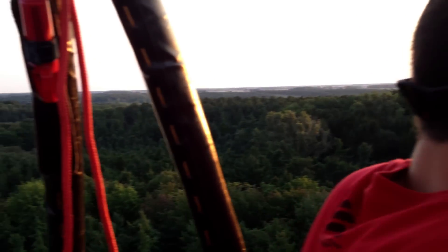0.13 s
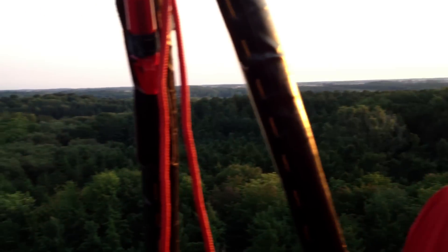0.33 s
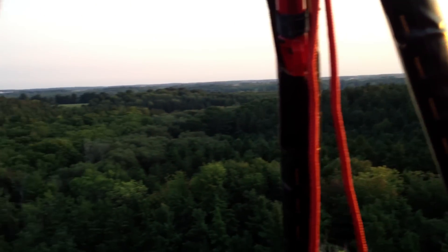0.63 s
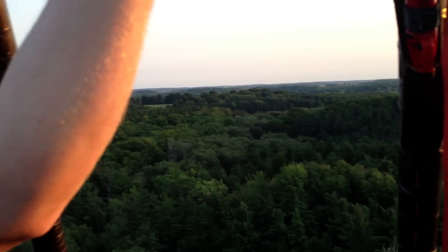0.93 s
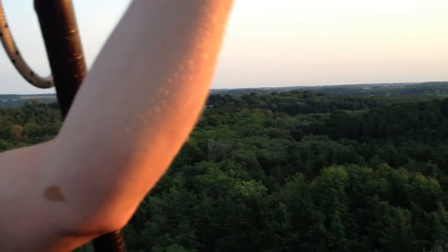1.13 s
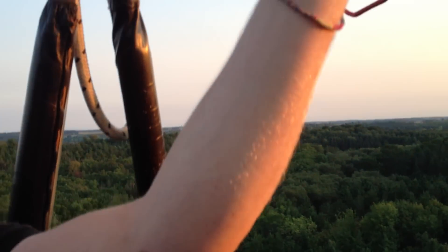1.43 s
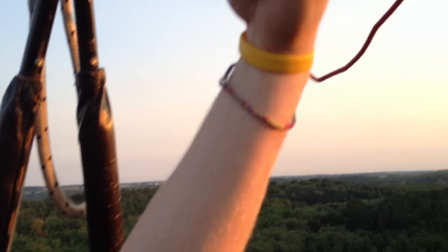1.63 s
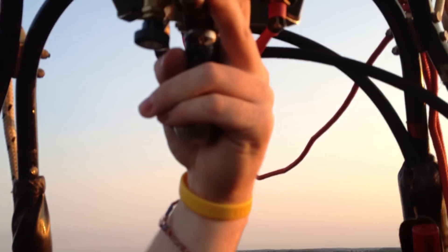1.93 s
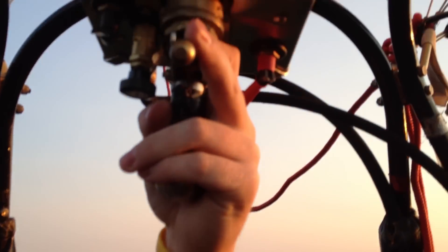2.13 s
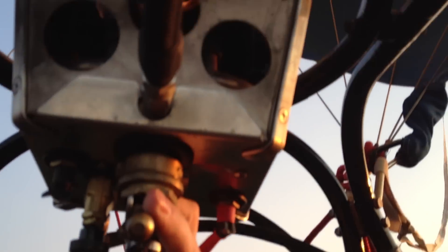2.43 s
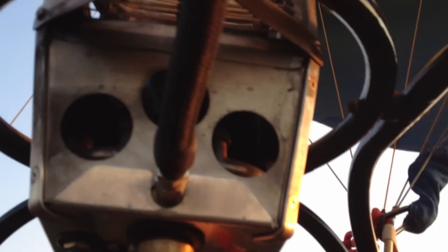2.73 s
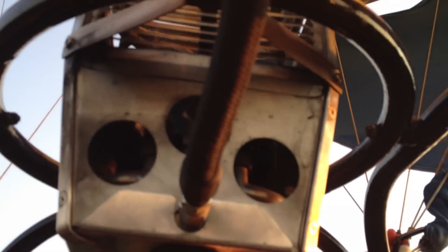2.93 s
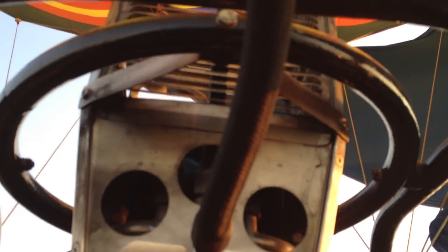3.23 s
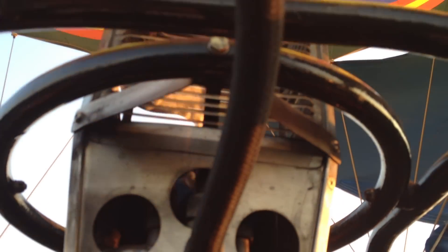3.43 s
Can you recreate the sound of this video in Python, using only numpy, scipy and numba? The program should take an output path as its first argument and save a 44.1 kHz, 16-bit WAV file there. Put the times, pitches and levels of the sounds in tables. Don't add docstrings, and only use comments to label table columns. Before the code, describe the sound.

Loud steady gas burner roar for two seconds, abrupt cutoff, then quiet pilot hiss and small pops.

```python
import sys
import numpy as np
from scipy import signal
from scipy.fft import rfft, irfft
from scipy.io import wavfile
from scipy.ndimage import uniform_filter1d, map_coordinates
from numba import njit

SR = 44100
rng = np.random.default_rng(int(sys.argv[2]) if len(sys.argv) > 2 else 0)


def invert_db(level):
    return 10 ** (np.asarray(level, dtype=float) / 20)


def log_audio(samples):
    frames = np.atleast_2d(samples).T
    limited = np.clip(frames, -1, 1)
    pcm = np.round(limited * 32767).astype(np.int16)
    wavfile.write(sys.argv[1], SR, pcm)


N = 158760
TOP_HZ = 15300

# start_s, flame_level_db, jet_level_db
BURN_LEVELS = [(0.0, -6.5, -13), (0.05, -9.5, -14), (0.1, -10.5, -12.5), (0.22, -8, -14),
               (0.27, -10, -13.5), (0.84, -10.5, -13.5), (0.88, -13, -16.5), (0.9, -11, -15),
               (1.13, -9, -13), (1.29, -9.5, -15.5), (1.62, -10, -14.5), (2.01, -13, -22.5),
               (2.05, -21, -28), (2.07, -18.5, -35.5), (2.16, -53, -64), (2.2, -28, -69)]
# frequency_hz, density_db
PILOT_AIR_SHAPE = [(600, -11.5), (1900, -16.5), (5000, -10.5), (6300, -14), (8500, -11), (10800, -18.5),
                   (12300, -10.5), (13300, -19), (14600, -16.5)]


def level(x, db):
    return x * invert_db(db) / np.sqrt(np.mean(x ** 2))


def curve(rows, col):
    rows = np.array(rows, float)
    return np.interp(np.arange(N) / SR, rows[:, 0], rows[:, col])


@njit
def svf(x, hz, width, rate):
    y, b, l = np.empty(len(x)), 0., 0.
    for i in range(len(x)):
        g, k = np.tan(np.pi * hz[i] / rate), width / hz[i]
        v = (b + g * (x[i] - l)) / (1 + g * (g + k))
        b, l, y[i] = 2 * v - b, l + 2 * g * v, k * v
    return y


def resonance(x, hz, width_hz):
    return svf(x, np.full(N, 1.) * hz, 1. * width_hz, 1. * SR)


def walk(rate):
    hold = int(SR / rate)
    steps = np.repeat(rng.standard_normal(N // hold + 1), hold)
    v = uniform_filter1d(uniform_filter1d(steps, hold), hold)[:N]
    return v - uniform_filter1d(v, size=SR // 4)


def eddies(shape, walk_db, flicker_db, flicker_rate):
    f = np.maximum(np.arange(N // 2 + 1) * SR / N, 1)
    hz, db = np.array(shape, float).T
    white = rfft(rng.standard_normal(N)) * invert_db(np.interp(np.log(f), np.log(hz), db, left=-90))
    out, swell = 0, walk_db * walk(flicker_rate)
    for octave in np.arange(np.log2(hz[0]), np.log2(hz[-1]) + 1, 1 / 3):
        overlap = np.clip(1 - 3 * np.abs(np.log2(f) - octave), 0, 1)
        band = irfft(white * overlap, N)
        out = out + band * invert_db(swell + flicker_db * walk(flicker_rate))
    return level(out, 0)


def flame_rumble():
    # frequency_hz, density_db
    flame_shape = [(30, -14), (64, -32), (139, -6.5), (230, 0), (386, -7), (620, -12), (790, -14.5),
                   (900, -20), (2200, -27), (3200, -60)]
    return eddies(flame_shape, -0.9, 1.5, 13.9) * invert_db(curve(BURN_LEVELS, 1))


def jet_hiss():
    # frequency_hz, density_db
    jet_shape = [(1500, 1), (2500, 2.5), (4300, -2.5), (5900, -0.5), (8700, 0.5), (9400, -3), (11000, -1.5),
                 (15000, -1)]
    # pitch_hz, width_hz, level_db
    coil_tones = [
        (2170, 290, -16.5),
        (4630, 650, -17),
    ]
    coil = sum(level(resonance(rng.standard_normal(N), hz, width), db) for hz, width, db in coil_tones)
    heat = np.clip((np.arange(N) / SR - 1.55) / 0.35, 0, 1)
    jet = eddies([(800, -22)] + list(jet_shape), 0.52, 1.55, 16.0)
    jet = jet + coil * invert_db(8.5 * heat)
    return jet * invert_db(curve(BURN_LEVELS, 2))


def pan_mirror(jet):
    extra_path_m, mirror_top_hz, mirror_db = 0.215, 9700, -29
    late = np.arange(N) - extra_path_m / 343 * SR
    dull = signal.sosfiltfilt(signal.butter(2, mirror_top_hz, fs=SR, output="sos"), jet)
    return invert_db(mirror_db) * map_coordinates(dull, [late], order=3, mode="mirror")


def turning_phone(flame, jet):
    # start_s, ridge_hz, ridge_db, shadow_depth (0-1), shadow_hz
    hand = [(0, 4280, -9, 0.57, 2100), (.25, 4340, -1.5, .5, 1990), (.55, 4300, -3, 0.22, 1810),
            (.7, 3440, -7, 0.2, 1750), (1.0, 3500, -2.5, 0.52, 1840), (1.2, 3900, 2.5, 0.73, 2210),
            (1.5, 3700, 1.5, 0.64, 2080), (1.7, 3480, -11, 0.22, 2730), (1.95, 3500, -8, 0.38, 2560),
            (2.1, 3500, 0, 0.28, 2450)]
    # start_s, low_glint_hz, low_glint_db, high_glint_hz, high_glint_db
    glint = [(0, 5130, -9, 7700, -6), (.4, 5200, -9, 7650, -12), (.7, 5170, 1, 7400, -3),
             (.95, 5200, -8, 7000, -7), (1.2, 5000, -6, 7550, -4.5), (1.5, 5030, -8, 7400, -11),
             (1.75, 4780, -10.5, 7700, -6.5), (2.1, 4700, -20, 7800, -18)]
    glint_widths = (350, 1200)
    # start_s, body_db, rim_hz, rim_db
    rim = [(0, -20, 1270, -6), (.4, -4, 1210, -10), (.8, 0.5, 1300, -11.5), (1.1, 1, 1470, -4),
           (1.5, 0.5, 1480, -5), (1.75, 0, 1110, -6), (1.95, 6, 1090, 7.5), (2.1, -6, 1070, 1)]
    roar = flame + jet + invert_db(curve(hand, 2)) * resonance(jet, curve(hand, 1), 500)
    for col, width in zip((1, 3), glint_widths):
        roar = roar + invert_db(curve(glint, col + 1)) * resonance(jet, curve(glint, col), width)
    body = invert_db(curve(rim, 1)) * resonance(flame, 598, 163)
    ring = invert_db(curve(rim, 3)) * resonance(roar, curve(rim, 2), 117)
    roar = roar + body + ring
    return roar - np.clip(curve(hand, 3), 0, 1) * resonance(roar, curve(hand, 4), 1100)


def burner():
    shut_s, closing_s = 2.2, 0.096
    flame, jet = flame_rumble(), jet_hiss()
    roar = turning_phone(flame, jet + pan_mirror(jet))
    return roar * np.clip((shut_s - np.arange(N) / SR) / closing_s, 0, 1)


def wide_patches():
    # middle_s, low_hz, high_hz, level_db
    patches = [
        (.09, 5700, 6900, -23.5),
        (.09, 11000, 13700, -22),
        (.88, 4230, 6300, -22),
        (1.16, 9700, 10900, -26),
        (1.51, 11900, 13200, -26),
        (1.879, 5760, 8250, -26),
        (1.88, 13800, 15200, -30),
        (1.95, 4240, 5150, -29),
    ]
    patch_s = 0.03
    f, t = np.arange(N // 2 + 1) * SR / N, np.arange(N) / SR
    white, side = rfft(rng.standard_normal(N)), 0
    for s, lo_hz, hi_hz, db in patches:
        fade = np.cos(np.pi * np.clip((t - s) / patch_s, -.5, .5)) ** 2
        side = side + level(irfft(white * (f > lo_hz) * (f < hi_hz), N), db) * fade
    return side * np.array([[1], [-1]])


def pilot_whistle(pitch_hz):
    # pitch_ratio, width_hz, level_db
    whistle_bands = [
        (.482, 120, -3),
        (.76, 140, -9),
        (1, 160, 0),
        (1.46, 380, -7),
        (1.94, 300, -12),
    ]
    upper = np.clip((np.arange(N) / SR - 2.3) / .18, .2, 1)
    tube = 0
    for ratio, width, db in whistle_bands:
        once = resonance(rng.standard_normal(N), ratio * pitch_hz, 1.6 * width)
        band = level(resonance(once, ratio * pitch_hz, 1.7 * width), 0)
        sputter = 1.8 * (walk(39.7) + walk(7.7))
        tube = tube + invert_db(db + sputter) * (upper if ratio > .5 else 1) * band
    return level(tube, 3)


def pilot():
    # start_s, hiss_db, whistle_hz, whistle_over_hiss_db
    pilot_course = [(2.14, -60.5, 4970, -5), (2.33, -58.5, 5130, -4), (2.47, -57.5, 5020, -1.5),
                    (2.6, -58, 4850, -2), (2.95, -56.5, 4910, -2), (3.1, -54, 5080, -1),
                    (3.3, -51, 4990, -5), (3.42, -50.5, 5200, -2.5), (3.6, -52, 5080, -4.5)]
    # frequency_hz, density_db
    rumble_shape = [(24, -60), (40, -18), (215, -3.5), (446, -16), (503, -10.5), (604, -21), (1500, -29),
                    (1950, -32), (3300, -120)]
    # start_s, level_db
    lick_levels = [(2.12, -37), (2.23, -44), (2.36, -42.5), (2.52, -44.5), (2.62, -50), (2.7, -52.5),
                   (2.85, -45.5), (2.92, -48), (3.05, -49.5), (3.2, -44.5), (3.6, -51.5)]
    whistle = pilot_whistle(curve(pilot_course, 2)) * invert_db(curve(pilot_course, 3))
    air = invert_db(4.5) * eddies(PILOT_AIR_SHAPE, .8, 2.2, 24.86)
    rumble = eddies(rumble_shape, 2.2, 3, 30.06) * invert_db(curve(lick_levels, 1))
    return (whistle + air) * invert_db(curve(pilot_course, 1)) + rumble


def flutters():
    # start_s, peak_db, pitch_hz, cycles
    early_licks = [(2.174, -32, 184, 4.9), (2.199, -25.5, 174, 2.8), (2.244, -40, 218, 3.4),
                   (2.269, -32, 312, 4.1), (2.275, -24, 210, 3.3), (2.293, -28, 215, 3.5),
                   (2.334, -25, 220, 4), (2.349, -27, 297, 3.4), (2.366, -29, 166, 4.1),
                   (2.373, -31, 402, 3.6), (2.714, -30, 155, 3.7), (2.738, -32, 178, 4.1),
                   (2.786, -31.5, 202, 3.6), (2.844, -29, 231, 2.3), (2.863, -26, 186, 2.3),
                   (2.869, -25, 147, 5.2), (2.901, -35, 142, 2.6), (3.078, -33.5, 233, 3.4),
                   (3.128, -32, 143, 2.9), (3.14, -31, 149, 3.2), (3.15, -40, 258, 2.5),
                   (3.167, -40, 250, 1.8), (3.157, -32, 122, 4.7), (3.179, -28, 178, 1.5),
                   (3.192, -27, 183, 2.1), (3.230, -29, 198, 1.4), (3.239, -28, 325, 3.2),
                   (3.261, -35, 298, 3.3), (3.082, -43, 1000, 8), (3.263, -42, 1020, 9.2)]
    # start_s, peak_db, pitch_hz, cycles
    late_licks = [(3.303, -34, 178, 2.8), (3.317, -35, 156, 3), (3.341, -28, 200, 2.4),
                  (3.352, -24.5, 182, 2.9), (3.374, -41, 229, 2.4), (3.389, -30, 175, 2),
                  (3.409, -27.5, 166, 4.4), (3.427, -32, 220, 5.6), (3.446, -31, 181, 2.7),
                  (3.46, -31, 121, 1.9), (3.496, -33.5, 149, 4.1), (3.564, -38, 288, 2.7),
                  (3.566, -47, 950, 6), (3.586, -33, 450, 3.3), (3.581, -25, 228, 2.3),
                  (3.588, -32, 238, 2.9)]
    out, t = np.zeros(N), np.arange(N) / SR
    grit = eddies([(250, 17.0), (450, 0), (800, -15), (1300, -19.5)], 0, 0, 25.) * invert_db(-13)
    licks = list(early_licks) + list(late_licks)
    for (s, db, hz, cycles), turn in zip(licks, rng.random(len(licks))):
        progress = np.clip((t - s) * hz / max(cycles, 1) + .15, 0, 1)
        out += invert_db(db) * np.sin(np.pi * progress) ** 2 * (np.sin(2 * np.pi * (hz * (t - s) + turn)) + grit)
    return out


def pops():
    # start_s, peak_db, ring_hz, suck_ms
    pop_events = [
        (2.3188, -22, 380, .8),
        (2.3246, -6.5, 370, .6),
        (2.368, -28, 520, .6),
        (2.8598, -27, 380, .9),
        (2.8805, -13, 260, 1.6),
    ]
    lead_hz, fall_ms, glide_ms, top_hz = 520, 2.3, 4.5, 1700
    out = 0
    for s, db, hz, suck_ms in pop_events:
        ms = (np.arange(N) / SR - s) * 1000
        after, before = np.maximum(ms, 0), np.minimum(ms, 0)
        turns = (hz * glide_ms * np.log1p(after / glide_ms) + lead_hz * before) / 1000
        envelope = np.exp(-after / fall_ms - (before / suck_ms) ** 2)
        out = out + invert_db(db) * envelope * np.cos(2 * np.pi * turns)
    out = out - uniform_filter1d(out, size=SR // 100)
    return signal.sosfiltfilt(signal.butter(2, top_hz, fs=SR, output="sos"), out)


def spits():
    # start_s, peak_db
    spit_events = [
        (2.5361, -39),
        (2.8794, -41),
        (3.086, -38),
        (3.3394, -40),
        (3.5215, -25.5),
        (3.545, -34),
    ]
    rise_s, t60_s = 0.0018, 0.064
    out, t = np.zeros(N), np.arange(N) / SR
    spray = eddies(PILOT_AIR_SHAPE[1:], 0, 0, 25.)
    for s, db in spit_events:
        rise = np.clip((t - s) / rise_s, 0, 1)
        decay = invert_db(db - 60 * np.clip(t - s, 0, 1) / t60_s)
        out += rise * 0.43 * decay * (t >= s) * spray
    return out


def scene():
    mono = burner() + pilot() + flutters() + pops() + spits()
    return np.array([mono, mono])


def gate(x):
    from_hz, under_db, quiet_db = 5500, -9, -25
    f, _, z = signal.stft(x, SR, nperseg=2048)
    near = uniform_filter1d(uniform_filter1d(np.abs(z) ** 2, size=5, axis=1), size=3, axis=2)
    high = (f > from_hz) & (f < TOP_HZ)
    mean = near[:, high].mean(axis=1, keepdims=True)
    quiet = mean < mean.max() * invert_db(2 * quiet_db)
    weak = high[:, None] & (near < mean * invert_db(2 * under_db)) & quiet
    return signal.istft(z * ~weak, SR, nperseg=2048)[1][:, :N]


def top_cut(x):
    return signal.sosfilt(signal.butter(12, 16520, fs=SR, output="sos"), x)


def record(dry):
    mic_low_hz, drive, gain_db = 91, .6, -1
    x = signal.sosfilt(signal.butter(2, mic_low_hz, "high", fs=SR, output="sos"), dry)
    x = np.tanh(drive * x) / drive
    x = signal.sosfilt(signal.ellip(12, .2, 90, TOP_HZ, fs=SR, output="sos"), x)
    mix = np.clip(invert_db(gain_db) * gate(x) + wide_patches(), -1, 1)
    return top_cut(mix)


dry = scene()
out = record(dry)
log_audio(out)
```